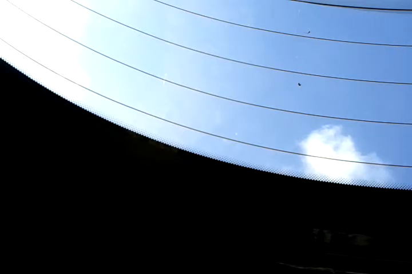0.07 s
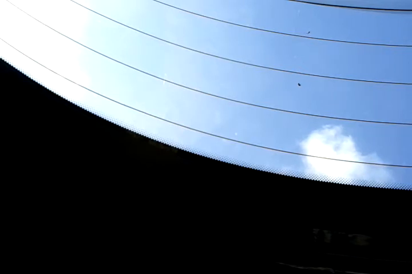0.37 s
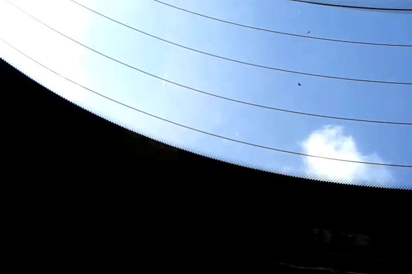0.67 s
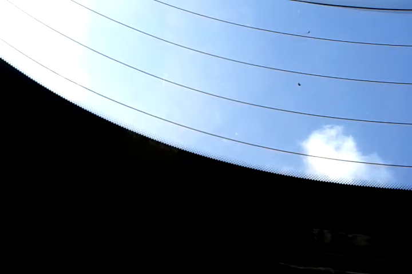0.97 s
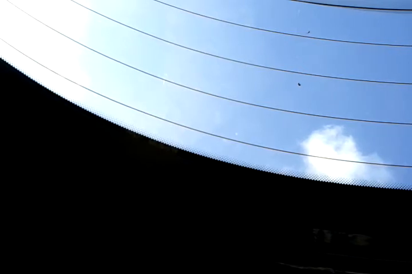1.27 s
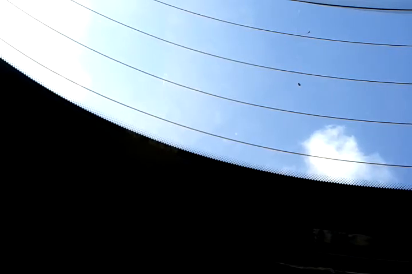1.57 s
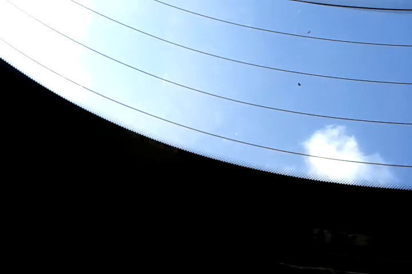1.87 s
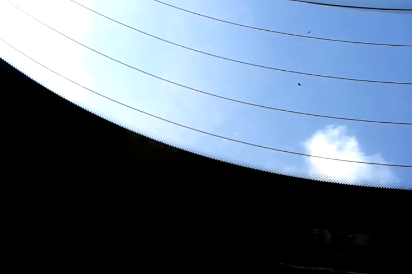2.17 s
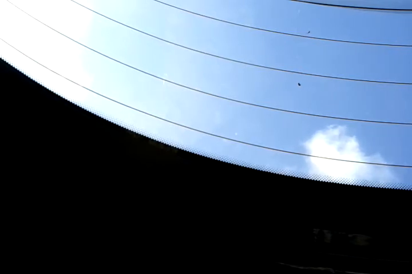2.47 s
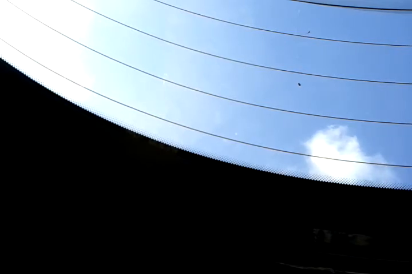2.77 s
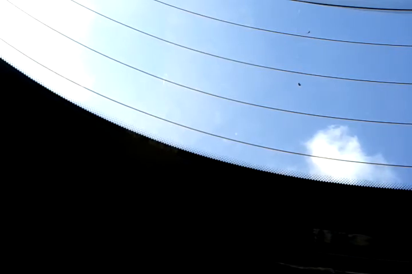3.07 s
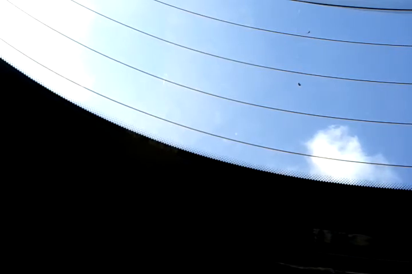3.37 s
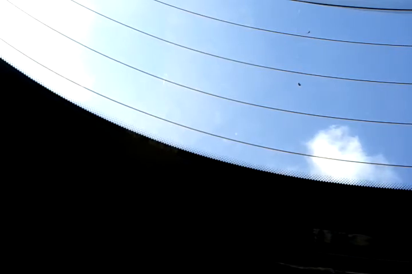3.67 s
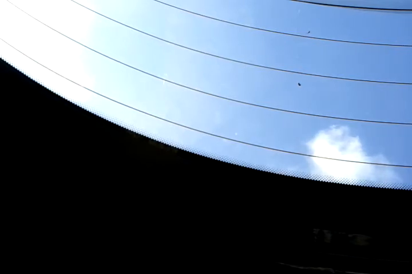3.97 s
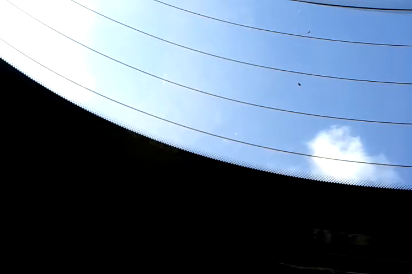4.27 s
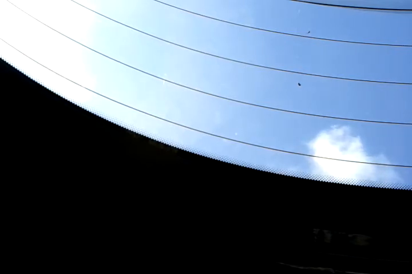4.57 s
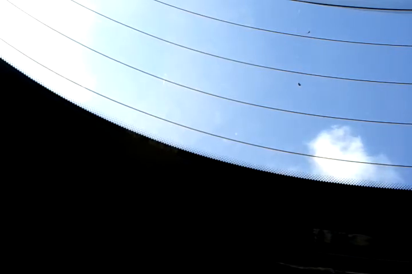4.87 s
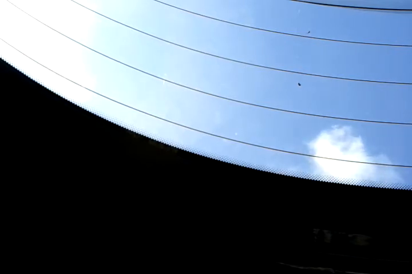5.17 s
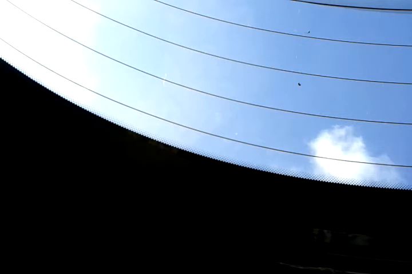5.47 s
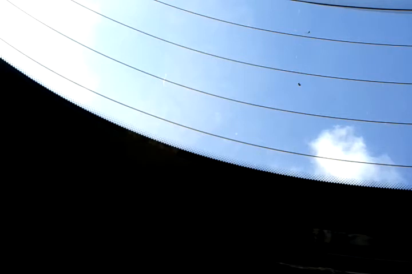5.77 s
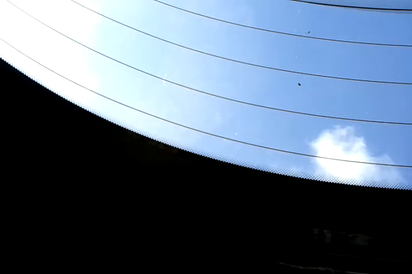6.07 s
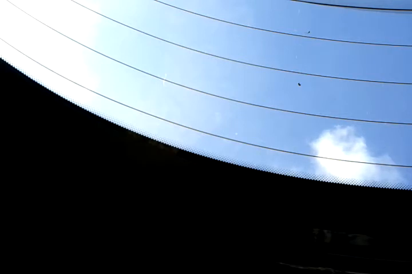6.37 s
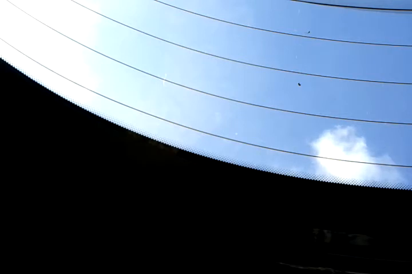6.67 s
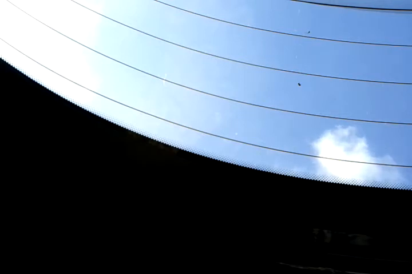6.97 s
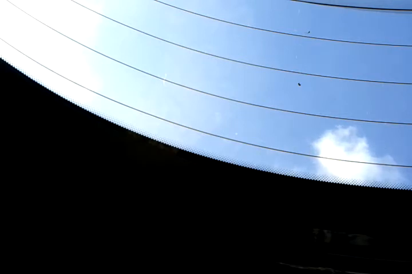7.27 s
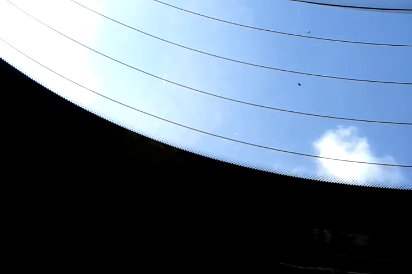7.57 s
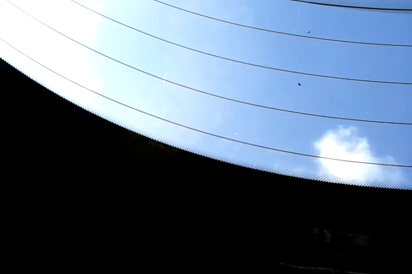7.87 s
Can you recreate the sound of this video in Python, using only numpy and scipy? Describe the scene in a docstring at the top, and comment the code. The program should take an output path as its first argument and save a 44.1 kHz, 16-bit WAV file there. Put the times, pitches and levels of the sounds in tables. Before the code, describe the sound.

Things are shifted about in the back of a parked car, with one heavy thump, dull knocks, creaking trim and clattering plastic.

```python
"""A heavy thump and softer knocks boom through a parked car as things are shifted about in the rear.
Each blow rings the body panels and the cabin air. Hard plastic parts clack, rattle and squeak, and the
trim creaks in short stick-slip bursts. Between them runs a light rustle and shuffle of tiny contacts;
near the end the body rumbles on its springs. A faint hiss and low drone lie underneath."""
import sys
import numpy as np
from scipy import signal
from scipy.fft import rfft, irfft, next_fast_len
from scipy.io import wavfile

SR = 44100
rng = np.random.default_rng(int(sys.argv[2]) if len(sys.argv) > 2 else 0)


def wav_record(signal):
    """Record a signal, one row per channel, as 16-bit PCM in the file named by sys.argv[1]."""
    frames = np.transpose(np.atleast_2d(signal))
    bounded = np.clip(frames, -1, 1)
    # unit amplitude maps onto the largest positive 16-bit level
    quanta = np.round(bounded * 32767).astype(np.int16)
    wavfile.write(sys.argv[1], SR, quanta)


N = 353549
EVENT_S = .02  # a short sound's level is its energy spread over this time

# tone of a hard plastic contact: (frequency [Hz], gain [dB])
PLASTIC_COLOUR = [(100, -27), (180, -6.5), (380, -7), (650, 4), (850, 4), (1150, -11), (1900, -16.5),
                  (2900, -16), (7000, 2), (8800, -20)]


def heavy_thump(s=.4385, push_s=.002, push_db=-6, snap_db=-35):
    """A large panel stops dead: a slower suction, one short push of air with a snap, then the boom."""
    # cabin air pumped by the thump: (pitch [Hz], gain [dB], build-up [s], t60 [s])
    air_modes = [(58.2, -14.5, 0.099, 0.52), (107, -24.5, 0.0078, 0.64)]
    out, t = np.zeros(N), clock(1)
    push, pull = (np.sin(np.pi * clock(span) / span) for span in (push_s, 2 * push_s))
    add(out, s - 2 * push_s, undb(push_db) * np.concatenate([-pull / 3, push]))
    snap = band(rng.standard_normal(len(t)), 1200, 3800, order=2) * fade(t, .0168)
    add(out, s - push_s / 2, sized(snap, snap_db))
    for hz, db, rise, t60 in air_modes:
        envelope = (1 - np.exp(-t / rise)) * fade(t, t60)
        add(out, s, undb(db) * envelope * np.sin(2 * np.pi * hz * t))
    return out


def knocks(attack_s=.0006, bloom_s=.035, thock_db=7, thock_t60=.4):
    """Each blow cracks, then rings the body's modes and a dense wash of panel vibration."""
    # blows on the body; boom, panel and edge are relative to the level at 130-450 Hz:
    # (time [s], level [dB], boom [dB], panel [dB], contact edge [dB], ring length [ratio])
    blows = [(0.008, -51.5, -6, 0.5, -10, 0.38), (0.063, -39.5, -11.5, -6.5, -19.5, 1.2),
             (0.42, -26.5, -17, 4, -14, 0.64), (0.4277, -25.5, -3, 5, -4.5, 0.36),
             (0.438, -20, -2, -5, -19.5, 0.86), (0.912, -44, 1, -11, -19.5, 0.6),
             (1.401, -45.5, -3, -2.5, -8, 1.1), (1.433, -51, 3.5, 2, -23, 0.56),
             (1.48, -49, -2.5, 0.5, -10, 0.24), (1.998, -44.5, -10, 1, -10.5, 0.61),
             (2.483, -56.5, -10, 0, -10.5, 0.21), (2.711, -44.5, -0.5, 7, -1, 2.3),
             (2.737, -36, -1, -17, -18, 0.87), (2.7593, -32.5, -3, 4, -15.5, 0.24),
             (2.802, -39, -1.5, -13, -25, 0.8), (2.864, -43, -10.5, -12, -17, 0.5),
             (3.079, -37.5, -15.5, -13, -18, 0.34), (3.174, -41.5, -15, -5.5, -32, 0.24),
             (3.599, -52, -13, -1, -7, 0.51), (4.271, -54.5, -16, 3.5, -14, .5), (4.936, -56, -4, 9, 0, 1),
             (5.262, -51, -8, -1.5, -24, 0.34), (7.762, -47.5, -13, -11.5, -11, 0.65),
             (7.881, -43, 1, 1, -12.5, 1.1), (7.901, -31.5, -6.5, -18.5, -27, 0.43),
             (7.994, -49, 4, -6, -17, 0.76)]
    # borders of the boom, main, panel and edge bands: (frequency [Hz])
    bands_hz = [25, 130, 450, 1400, 9000]
    # resonances of body panels and cabin air: (pitch [Hz], relative level [dB], t60 [s])
    body_modes = [(59, -3, .6), (105, 1, .45), (122, -1, .3), (151, -2, .37), (166, -2, .28), (199, -4, .3),
                  (262, -2, .33), (350, -2, .22), (417, -1, .28), (512, 2, .24), (596, -1, .2),
                  (764, 6, .12), (887, 0, .16), (985, -4, .2)]
    # decay of the dense ringing at a ring length of 1: (frequency [Hz], t60 [s])
    wash_decay = [(40, 1), (120, 0.87), (250, 0.53), (500, 0.5), (1000, 0.5), (2000, 0.45), (4000, 0.5),
                  (8000, 0.033)]
    # the wash thins out in the bass, where only single modes are left: (frequency [Hz], gain [dB])
    wash_colour = [(30, -3), (45, -9), (85, -9.5), (125, 1.5), (250, -2.5)]
    knock_colour = [(25, 10.5), (60, 19), (900, -10), (2000, -4.5), (4000, -5), (7000, -2.5), (9000, -26)]
    out, t = np.zeros(N), clock(.9)
    octaves = [(band(rng.standard_normal(N), hz, 2 * hz), at(wash_decay, hz * np.sqrt(2)))
               for hz in 30 * 2. ** np.arange(9)]
    # the struck panel sheds most of its energy quickly; the rest of the body rings on
    thock = 1 + undb(thock_db) * fade(t, thock_t60)
    for s, db, boom_db, panel_db, edge_db, length in blows:
        start = rng.integers(N - len(t))
        wash = sum(noise[start:start + len(t)] * fade(t, t60 * length) for noise, t60 in octaves)
        wash = colour(thock * wash, wash_colour)
        crack = rng.standard_normal(len(t)) * fade(t, t60=.055)
        modes = 0
        for hz, mode_db, t60 in body_modes:
            # every spot drives the modes differently; the deepest need a few cycles to build up
            drive = undb(mode_db + 2.6 * rng.standard_normal()) * rng.choice([-1, 1])
            bloom = 1 - np.exp(-t / bloom_s * (hz / body_modes[0][0]) ** 2)
            detuned_hz = hz * (1 + .0025 * rng.standard_normal())
            modes += drive * bloom * fade(t, t60 * np.sqrt(length)) * np.sin(2 * np.pi * detuned_hz * t)
        ring = sized(modes, -11) + sized(wash, -2) + sized(crack, -2)
        ring = colour(ring * (1 - np.exp(-t / attack_s)), knock_colour)
        add(out, s, balance(ring, bands_hz, db + np.array([boom_db, 0, panel_db, edge_db])))
    return out


def clacks():
    """Hard parts clack once or rattle; each contact point has its own share of body and edge."""
    # single plastic hits; body and edge are relative to the mid-band level:
    # (time [s], swell [s], level [dB], hollow body [dB], bright edge [dB])
    hits = [(0.297, .0015, -53, 2.5, -8.5), (0.822, .002, -57.5, -2, 0), (1.252, .003, -58.5, -7, 2.5),
            (1.311, .004, -60, 6, 8.5), (2.03, .0015, -54.5, -11, -1.5), (2.319, .004, -43, -8, -0.5),
            (3.103, 0.004, -47, -8, -1), (3.196, .008, -38, -5, -2), (3.222, .0015, -45, -4, -0.5),
            (3.403, 0.005, -43.5, -5.5, 0), (3.446, 0.0025, -45.5, 0, -6), (3.53, .004, -44, 5.5, -5),
            (3.583, .014, -42, 1, -6), (3.643, .002, -39, -3, 5), (4.079, .0025, -59.5, 1, 4.5),
            (4.245, .02, -49.5, 1.5, 2.5), (4.31, .002, -48.5, 0, 5), (4.442, .002, -56.5, -1, 2),
            (4.541, .004, -50.5, 2, 0), (4.675, .002, -51, -3, 0.5), (4.919, .0016, -66, 11, 11.5),
            (5.258, .0015, -48.5, -25, -1), (5.374, .002, -59.5, -15, 1.5), (5.961, .003, -46, -5, -7),
            (6.245, .026, -41.5, -11, -5), (7.182, .002, -48, -6.5, -7), (7.489, .0036, -35.5, 0.5, -11.5),
            (7.578, 0.0022, -44.5, 5, 0), (7.596, .003, -38, 0, 2.5), (7.621, .0016, -45.5, 6, 0.5)]
    # borders of the body, mid and edge bands: (frequency [Hz])
    bands_hz = [400, 1300, 3200, 10000]
    out, t = np.zeros(N), clock(.19)
    for s, swell, db, body_db, edge_db in list(hits) + rattle_strikes():
        hit = contacts(t, swell + .001, release=.004, rate=2600, scatter_db=2)
        hit = colour(cabin(hit, t60=.076, wet_db=2.5), PLASTIC_COLOUR)
        add(out, s, balance(hit, bands_hz, db + np.array([body_db, 0, edge_db])))
    return out


def rattle_strikes(gap_s=.044, swell_s=.0043, growth_db=3):
    """A loose part strikes at an even pace, tending louder; each strike is a row for clacks()."""
    # loose parts: (first strike [s], last strike [s], level [dB], hollow body [dB], bright edge [dB])
    rattles = [(3.282, 3.356, -49, -1, -3.5), (3.798, 3.894, -54.5, 2, 1), (4.731, 4.771, -63.5, 0, 0.5),
               (6.147, 6.24, -52.5, -8, 0.5), (7.269, 7.358, -57, 3.5, -4)]
    rows = []
    for first, last, db, body_db, edge_db in rattles:
        count = round((last - first) / gap_s) + 1
        for s, growth in zip(np.linspace(first, last, count), np.linspace(-.5, .5, count)):
            rows.append((s, swell_s, db + growth * growth_db + rng.standard_normal(), body_db, edge_db))
    return rows


def creaks(width_hz=470):
    """Stick-slip rings a piece of trim at its main resonance and at a thin high overtone."""
    # trim giving way: (time [s], swell [s], level [dB], ring [Hz], overtone relative to the ring [dB])
    bursts = [(1.033, .003, -50.5, 2320, -14), (1.118, 0.0048, -37.5, 1930, -8.5),
              (1.162, .007, -47, 1890, -21), (1.331, .003, -48, 2240, -10), (1.55, .018, -52.5, 1870, -8.5),
              (1.697, .007, -39.5, 2136, -14.5), (1.808, .005, -56, 2200, -23),
              (2.137, .0015, -49, 1900, -11), (2.187, .005, -50, 2160, -5.5),
              (2.259, .002, -43.5, 1980, -7.5), (2.384, .003, -36.5, 2040, -15),
              (2.487, .002, -44.5, 1850, -24), (2.902, .005, -46.5, 2050, -17.5),
              (3.004, 0.0041, -43.5, 1740, -8.5), (3.12, .003, -44, 1880, -10.5),
              (5.127, .017, -49, 2090, -8), (5.744, .003, -39.5, 1670, -12.5), (5.87, .017, -43, 2160, -5),
              (6.012, .003, -38.5, 1860, -9.5), (6.3148, 0.00153, -34.5, 1930, -15),
              (6.842, .018, -54, 2200, -3), (6.885, .002, -60, 2300, -5), (7.908, .0015, -44.5, 1870, -22)]
    # a small slip, the main one and a settling one: (time offset [s], level offset [dB])
    stages = [(-.021, -15), (0, -1.5), (.019, -15)]
    out, t = np.zeros(N), clock(.13)
    for s, swell, db, hz, overtone_db in bursts:
        for lag, slip_db in stages:
            slips = contacts(t, swell + .001023, release=.0041, rate=1600, scatter_db=0)
            slips = cabin(slips, t60=.073, wet_db=5)
            ring = sized(steep_ring(slips, hz, width_hz), 0) + sized(band(slips, 1200, 2200, order=2), -7)
            overtone = sized(resonate(resonate(slips, 6200, 840), 4740, 2100), 6)
            overtone += sized(band(slips, 2700, 4150), -13.5)
            add(out, s + lag, sized(ring, db + slip_db) + sized(overtone, db + slip_db + overtone_db))
    return out


def squeaks(width_hz=280, gain_db=-8):
    """Plastic sliding on plastic keeps one small, high resonance ringing."""
    # thin squeaks: (time [s], level before gain_db [dB], pitch [Hz], release [s])
    rubs = [(1.308, -46, 7540, .01), (2.5424, -40, 7500, .015), (5.959, -41, 7870, 0.045),
            (6.037, -41.5, 6950, 0.064), (6.242, -39.5, 7760, 0.07), (7.661, -37.5, 7200, 0.0087)]
    out, t = np.zeros(N), clock(.14)
    for s, db, hz, release in rubs:
        slips = contacts(t, .005, release, rate=3000, scatter_db=2) * rng.choice([-1, 1], len(t))
        add(out, s, sized(steep_ring(slips, hz, width_hz), db + gain_db))
    return out


def shuffling():
    """Soft things shuffle in a dull stream of contacts; the load never lies quite still."""
    # soft movements: (start [s], length [s], level [dB])
    shuffles = [(0, 0.068, -62), (.38, 0.14, -43), (.91, 0.12, -52), (1.33, 0.15, -50.5), (1.55, .1, -64),
                (3.27, 0.36, -53.5), (4.15, 0.48, -62.5), (4.92, .06, -71), (7.26, 0.36, -61.5),
                (7.5, 0.58, -56.5)]
    # muffled tone of soft contacts: (frequency [Hz], gain [dB])
    soft_colour = [(50, -19.5), (110, -3.5), (170, 0), (330, -4.5), (620, 0), (850, -8.5), (1300, -11),
                   (2600, -51.5)]
    shuffle = colour(grains(rate=600, scatter_db=1.6, t60=.037), soft_colour)
    return unit(shuffle) * moving(shuffles, rest_db=-66.5)


def sliding(tick_db=-17):
    """Hard parts rustle and tick as they slide, and some drag on the trim."""
    # hard parts on the move: (start [s], length [s], rustle [dB], drag relative to the rustle [dB])
    moves = [(1.025, 0.12, -61.5, -9), (1.379, 0.075, -58, -4), (1.572, .17, -65.5, 9),
             (2.186, 0.22, -52.5, -3), (2.478, 0.05, -53, 0.5), (2.944, 0.18, -58, 1),
             (3.205, 0.23, -46.5, -23), (3.546, 0.078, -50.5, -12), (3.822, 0.29, -56.5, -11),
             (4.179, 0.11, -50, -5), (4.41, .2, -55, -19), (5.18, 0.24, -59.5, -5.5), (5.704, 0.14, -58, 2),
             (5.857, .19, -52.5, -6), (6.215, 0.047, -50.5, -9), (7.245, 0.34, -61.5, -17),
             (7.428, 0.21, -50.5, -16), (7.7, 0.18, -66, 3)]
    # light, papery tone of the rustle: (frequency [Hz], gain [dB])
    rustle_colour = [(410, -38), (700, -4), (1160, 0.5), (2080, -1.5), (2770, -5.5), (3970, -9),
                     (7260, -5.5), (8160, -15.5), (8790, -37), (11400, -45.5), (19300, -120)]
    slides = [(s, length, db) for s, length, db, _ in moves]
    drags = [(s, length, db + drag_db) for s, length, db, drag_db in moves]
    rustle = colour(grains(rate=700, scatter_db=2.3, t60=.059), rustle_colour)
    ticks = colour(grains(rate=29, scatter_db=5.5, t60=.04), PLASTIC_COLOUR)
    drag = steep_ring(grains(rate=150, scatter_db=2.5, t60=.06), hz=2050, width_hz=700)
    return (unit(rustle) * moving(slides, rest_db=-67.5)
            + unit(ticks) * moving(slides) * undb(tick_db)
            + unit(drag) * moving(drags))


def rocking():
    """The body rumbles on its springs as the load shifts."""
    # swell of the rumble: (time [s], level [dB])
    swell = [(7.15, -70), (7.21, -61.5), (7.46, -61.5), (7.65, -52.5), (7.93, -46.5), (8.017, -48)]
    times, levels_db = np.transpose(swell)
    t = np.arange(N) / SR
    rumble = unit(band(rng.standard_normal(N), 47.4, 134))
    return rumble * undb(np.interp(t, times, levels_db)) * (t > times[0])


def room_tone(hiss_db=-65, drone_db=-74.5):
    """Steady hiss with a faint low drone of the cabin air."""
    # dark tone of the hiss: (frequency [Hz], gain [dB])
    hiss_colour = [(15, -84), (25, -38), (70, -1), (233, -21), (463, -7), (523, -15.5), (592, -16),
                   (686, -5), (738, -15.5), (5000, -23.5), (8790, -61), (11400, -62.5), (19300, -120)]
    hiss = unit(colour(rng.standard_normal(N), hiss_colour))
    drone = unit(resonate(rng.standard_normal(N), hz=81, width_hz=6))
    return hiss * undb(hiss_db) + drone * undb(drone_db)


def cabin(x, t60, wet_db):
    """Direct sound and the dense, quickly absorbed reflections from glass and trim."""
    t = np.arange(len(x)) / SR
    echoes = rng.standard_normal(len(t)) * fade(t, t60)
    response = undb(wet_db) * echoes / np.sqrt(np.sum(echoes ** 2))
    response[0] += 1
    return signal.fftconvolve(x, response)[:len(x)]


def contacts(t, swell, release, rate, scatter_db):
    """Tiny collisions, about rate a second, that build up for swell seconds and then die away."""
    chance, size = rng.random(len(t)), rng.standard_normal(len(t))
    force = np.where(t < swell, (1 + 4 * t / swell) / 5, np.exp(-np.maximum(t - swell, 0) / release))
    pulses = (chance < rate / SR) * undb(scatter_db * np.clip(size, -2, 2)) * force
    pulses[0] += force[0]  # first touch
    pulses[int(swell * SR)] += undb(scatter_db)  # main hit
    return pulses


def grains(rate, scatter_db, t60):
    """A stream of small contacts of unequal size, each a short puff of noise."""
    sizes = (rng.random(N) < rate / SR) * undb(scatter_db * np.minimum(rng.exponential(size=N), 4))
    power = signal.lfilter([1], [1, -fade(1 / SR, t60) ** 2], sizes ** 2)
    return np.sqrt(power) * rng.standard_normal(N)


def moving(moves, rest_db=-np.inf, attack_s=.016, release_s=.071):
    """Envelope of a series of movements: each sets in, holds and dies away."""
    t, power = np.arange(N) / SR, undb(rest_db) ** 2
    for s, length, db in moves:
        attack = np.clip((t - s) / attack_s, 0, 1)
        release = np.exp(-np.clip(t - s - length, 0, 1) / release_s)
        power = power + (undb(db) * attack * release) ** 2
    return np.sqrt(power)


def balance(x, edges_hz, levels_db):
    """Smooth EQ that brings each band of a short sound towards its level in two passes."""
    size = next_fast_len(len(x))
    centres = np.sqrt(np.multiply(edges_hz[:-1], edges_hz[1:]))
    bins = (np.array(edges_hz) * size / SR).astype(int)
    gains_db = np.zeros(len(centres))
    shaped = x
    for _ in range(2):
        energy = np.add.reduceat(np.abs(rfft(shaped, size)) ** 2, bins)[:-1] * 2 / size
        gains_db += levels_db - 10 * np.log10(energy / (EVENT_S * SR))
        shaped = undb(gains_db.max()) * colour(x, np.column_stack([centres, gains_db - gains_db.max()]))
    return shaped


def colour(x, points, size=4096):
    """Minimum-phase EQ through (frequency [Hz], gain [dB]) points: nothing rings ahead of a hit."""
    gains_db = np.maximum(at(points, np.arange(size // 2 + 1) * SR / size), -70)
    cepstrum = irfft(np.log(undb(gains_db)))
    cepstrum[1:size // 2] *= 2
    cepstrum[size // 2 + 1:] = 0
    return signal.fftconvolve(x, irfft(np.exp(rfft(cepstrum))))[:len(x)]


def at(points, hz):
    """Read (frequency [Hz], value) points on a log-frequency axis."""
    f, value = np.transpose(points)
    return np.interp(np.log(hz + 1e-9), np.log(f), value)


def band(x, lo, hi, order=3):
    """Causal band-pass."""
    return signal.sosfilt(signal.butter(order, [lo, hi], "band", fs=SR, output="sos"), x)


def resonate(x, hz, width_hz):
    """One damped resonance."""
    return signal.lfilter(*signal.iirpeak(hz, hz / width_hz, fs=SR), x)


def steep_ring(x, hz, width_hz):
    """A resonance with its skirts steepened by a second one twice as wide."""
    return resonate(resonate(x, hz, width_hz), hz, 2 * width_hz)


def undb(db):
    """Decibels to gain."""
    return 10 ** (np.asarray(db) / 20)


def clock(seconds):
    """Sample times of a stretch."""
    return np.arange(int(seconds * SR)) / SR


def fade(t, t60):
    """Exponential decay by 60 dB in t60."""
    return np.exp(-np.log(1000) * t / t60)


def unit(x):
    """Scale to rms 1."""
    return x / np.sqrt(np.mean(x ** 2))


def sized(x, db):
    """Give a short sound the energy of EVENT_S seconds at this level."""
    return x * undb(db) * np.sqrt(EVENT_S * SR / np.sum(x ** 2))


def add(out, s, x):
    """Mix a sound in at time s."""
    i = max(int(s * SR), 0)
    out[i:i + len(x)] += x[:N - i]


def scene():
    """All sources at one microphone in the cabin."""
    events = knocks() + heavy_thump() + clacks() + creaks() + squeaks()
    bed = shuffling() + sliding() + rocking() + room_tone()
    return (events + bed)[None]


def record(dry, top_hz=8700):
    """The recorder cuts the treble steeply."""
    return signal.sosfilt(signal.ellip(8, .3, 60, top_hz, fs=SR, output="sos"), dry)


dry = scene()
out = record(dry)
wav_record(out)
```